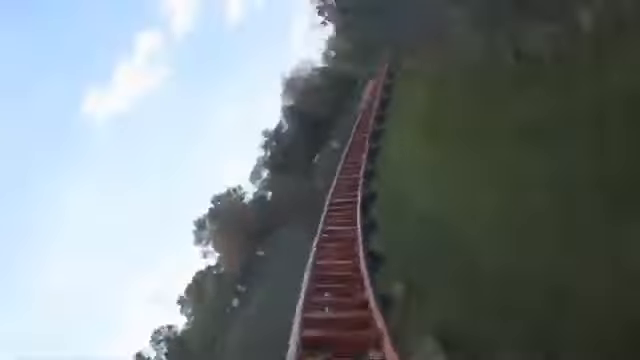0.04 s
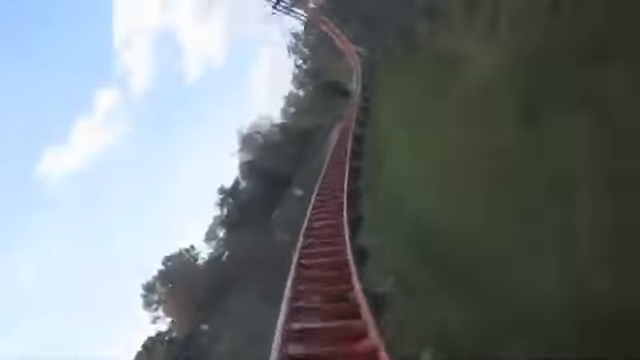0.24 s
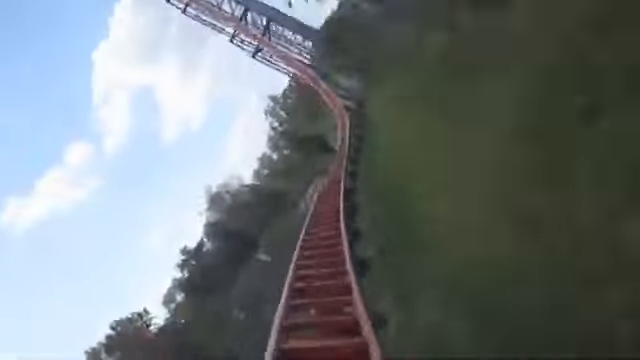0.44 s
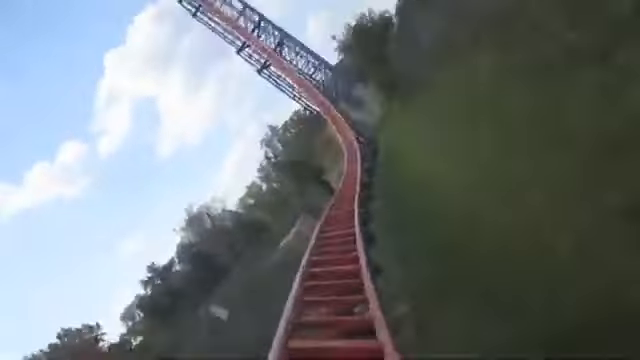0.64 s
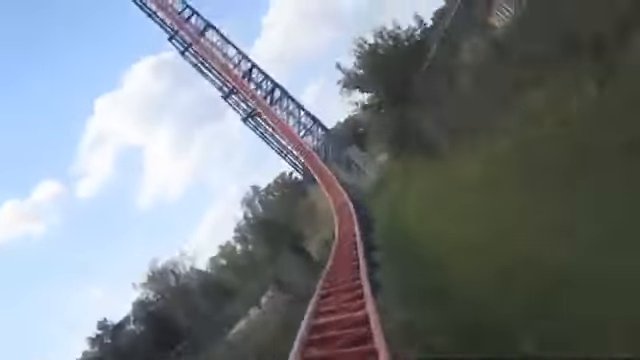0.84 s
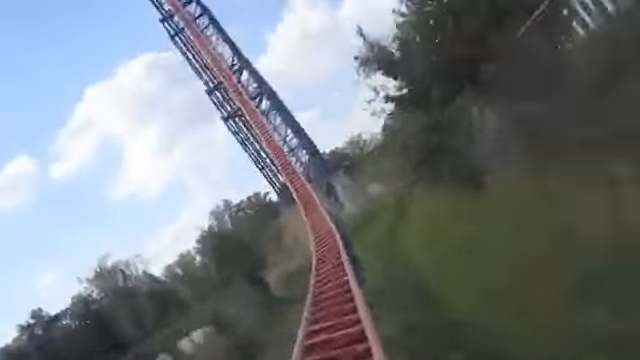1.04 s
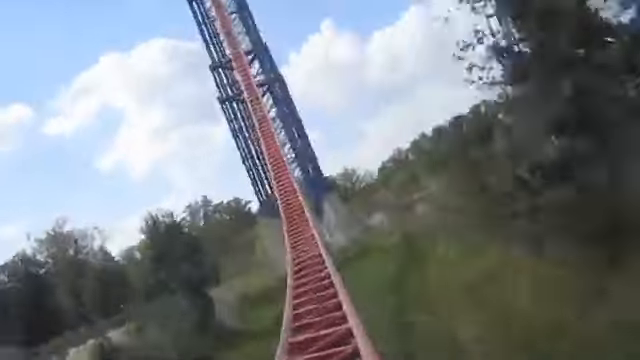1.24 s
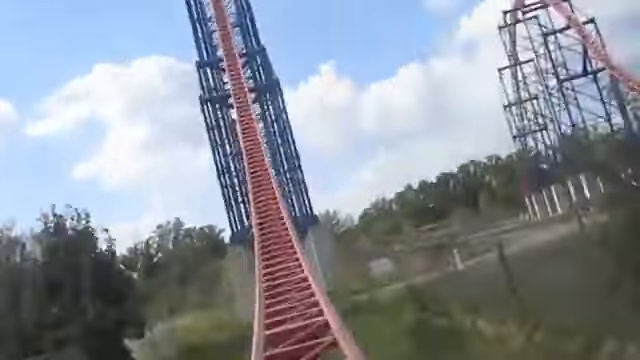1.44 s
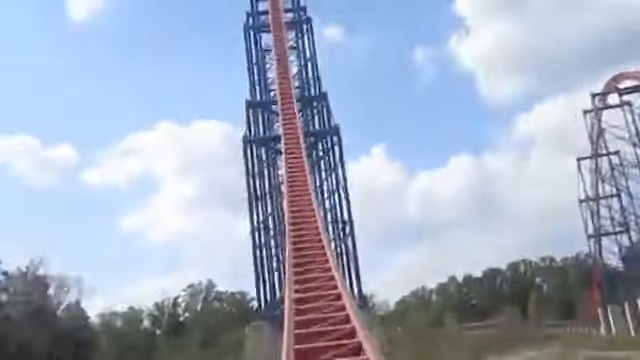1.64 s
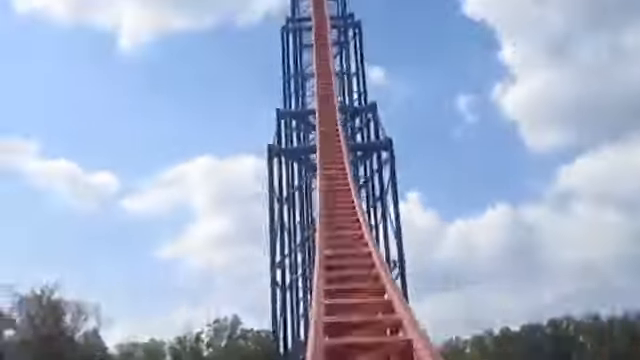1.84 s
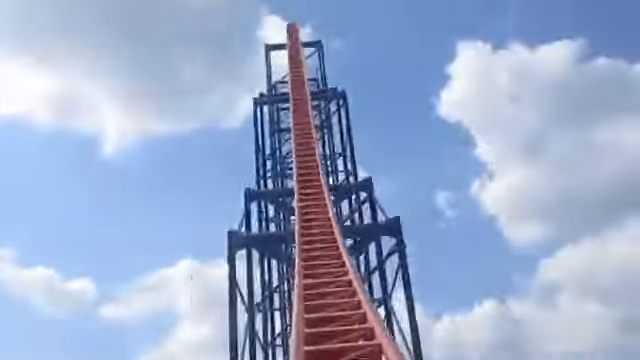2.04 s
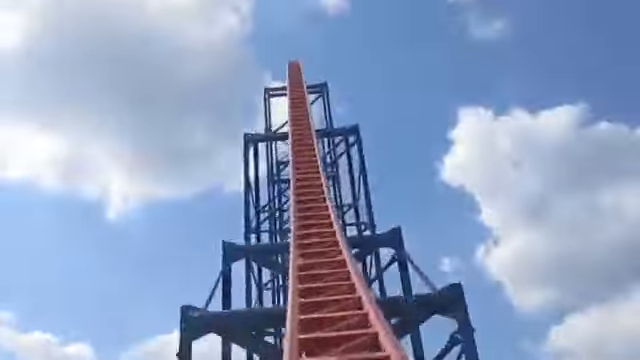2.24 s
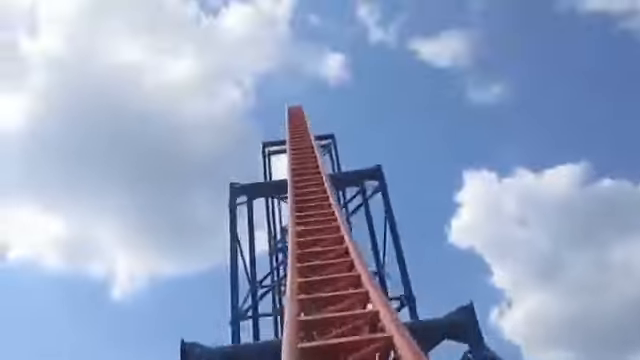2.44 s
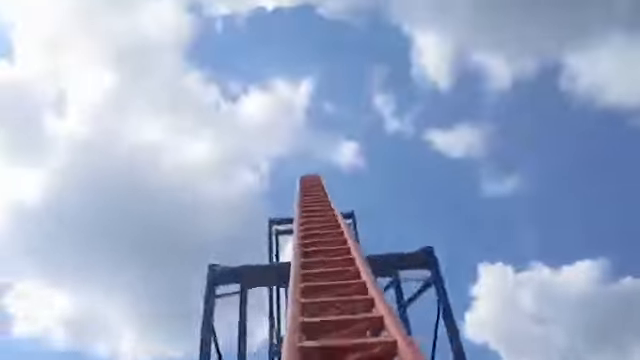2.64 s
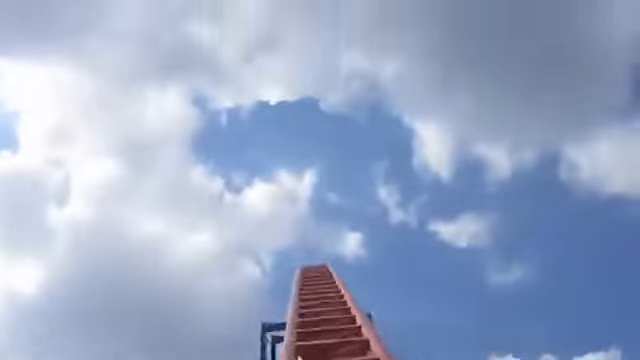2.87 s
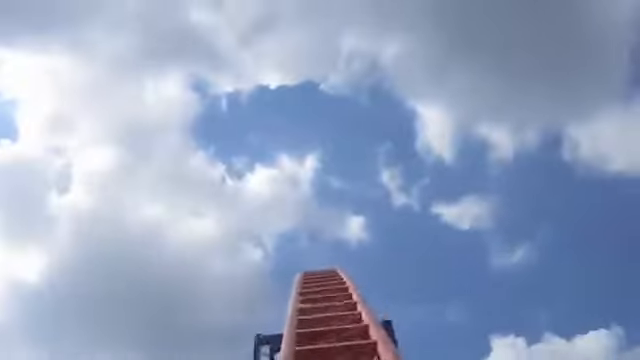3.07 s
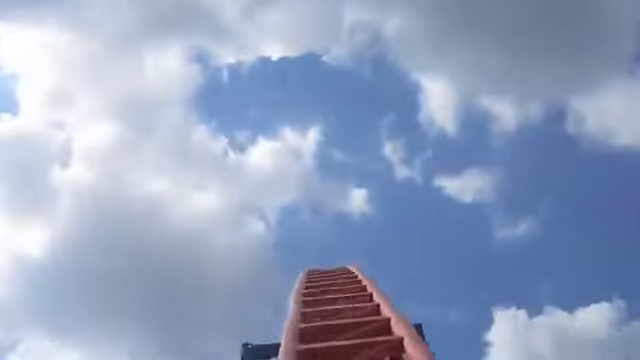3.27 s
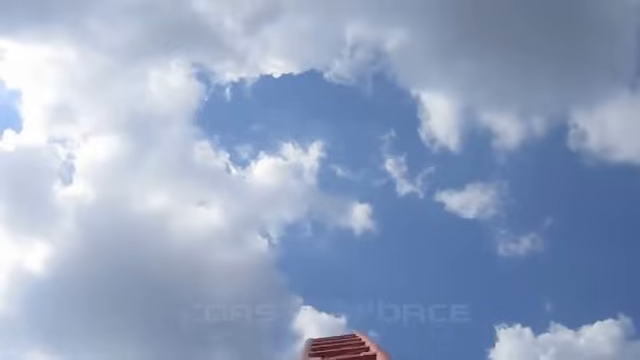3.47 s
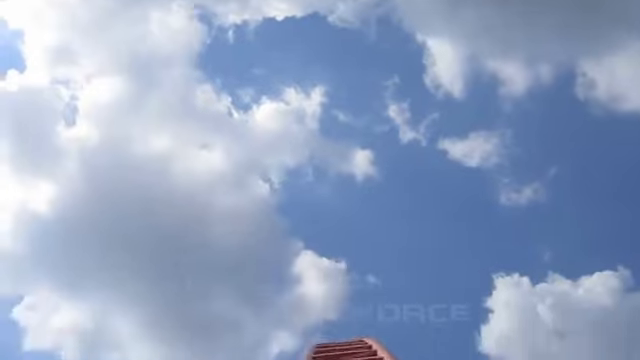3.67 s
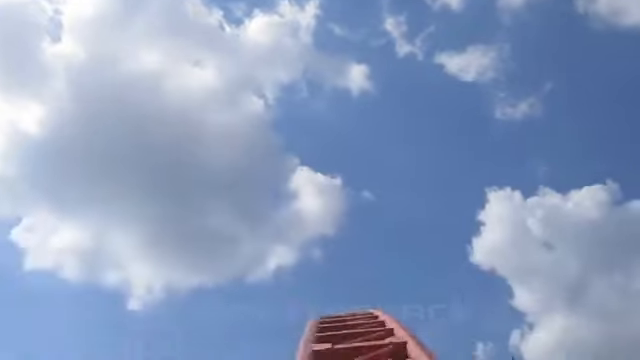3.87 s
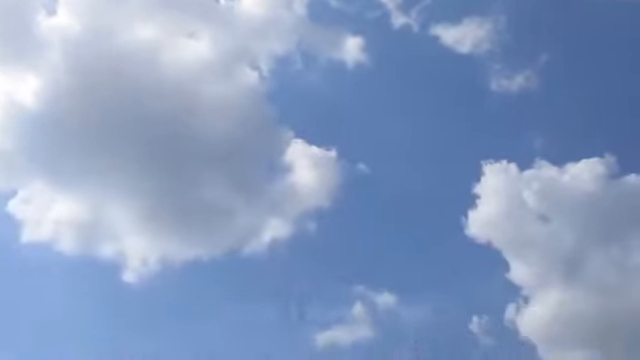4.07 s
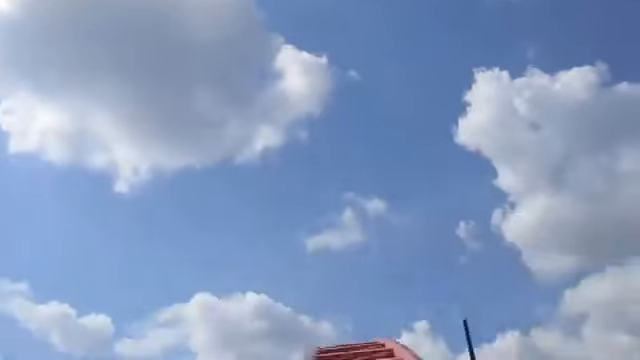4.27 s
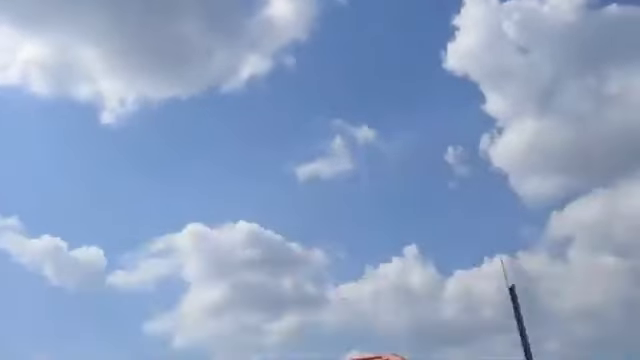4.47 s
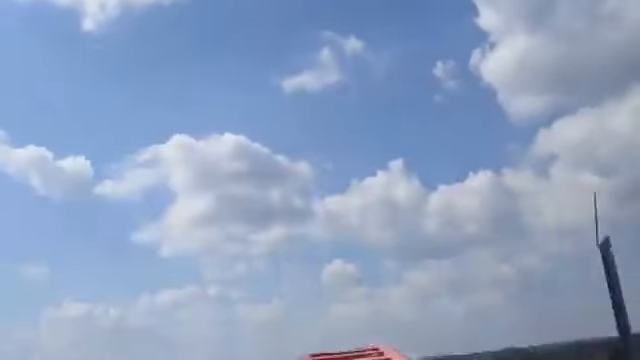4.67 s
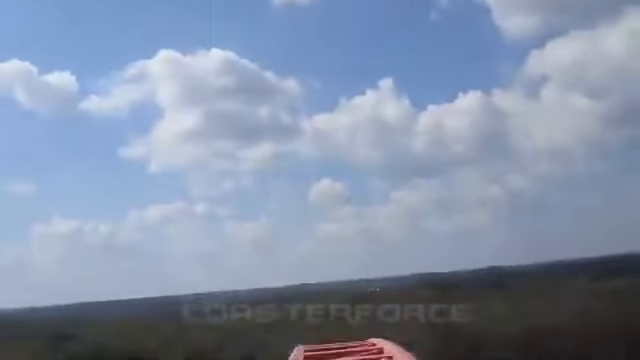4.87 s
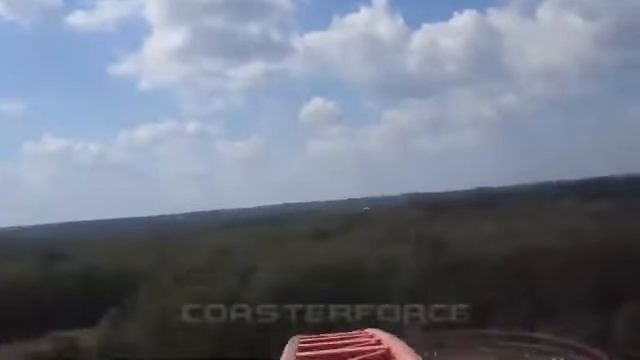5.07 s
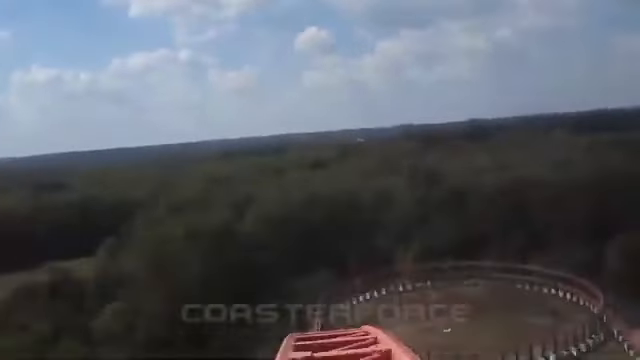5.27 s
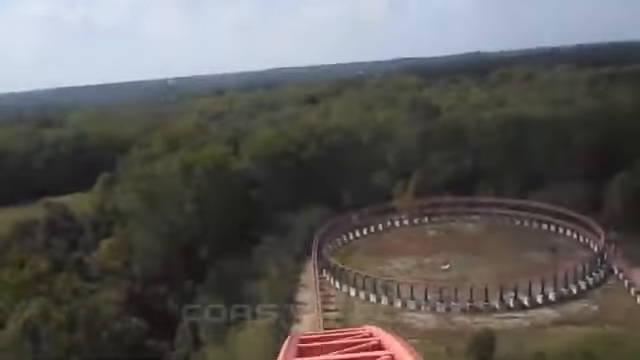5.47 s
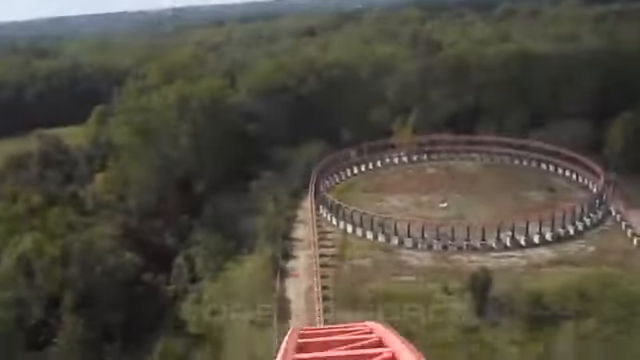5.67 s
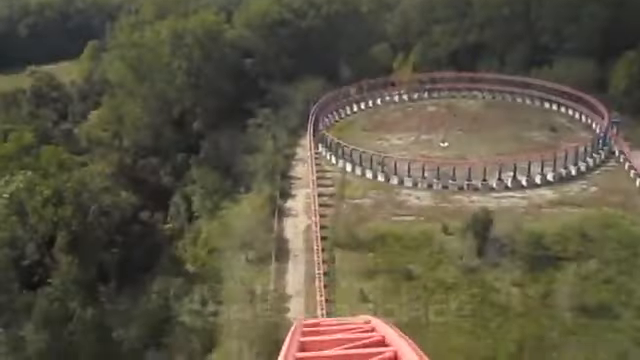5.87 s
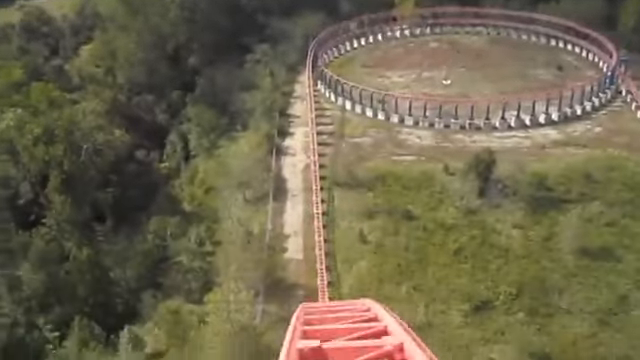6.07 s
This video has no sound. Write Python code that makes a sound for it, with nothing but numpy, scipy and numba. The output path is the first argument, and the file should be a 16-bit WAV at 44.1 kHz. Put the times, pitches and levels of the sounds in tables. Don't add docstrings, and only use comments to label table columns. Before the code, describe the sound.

Loud distorted roar of a steel coaster train with buffeting wind and metallic knocks, easing after three and a half seconds to a quieter rumble with small ticks.

```python
import sys
import numpy as np
from scipy import signal
from scipy.io import wavfile
from scipy.ndimage import uniform_filter1d
from numba import njit

SR = 44100
rng = np.random.default_rng(int(sys.argv[2]) if len(sys.argv) > 2 else 0)


def wav_out(sig):
    wavfile.write(sys.argv[1], SR, np.round(np.clip(np.atleast_2d(sig).T, -1, 1) * 32767).astype(np.int16))


def natural_amplitude(level_db):
    exponent = np.asarray(level_db, float) / 20
    return 10 ** exponent


N = 269451

# (time [s], rolling load [dB], air turbulence [dB])
RIDE = [(0, 2, 5.5), (.35, 3.5, -4.5), (.75, 2, 3), (.9, -1, -3), (1.3, -1, -5), (1.7, 1, -0.5),
        (2.05, 1, -2.5), (2.5, 2.5, -2.5), (3.0, 3.5, -0.5), (3.5, -1, -6), (3.75, -6.5, -10.5),
        (3.95, -10, -21), (4.15, -8, -12), (4.55, -6.5, -11), (4.85, -11.5, -19.5), (5.3, -11.5, -19.5),
        (5.5, -10.5, -16.5), (6.11, -11, -21)]
# (time [s], swell [dB], half width [s])
GUSTS = [(0.027, -23, 0.038), (0.091, 0, 0.0097), (.17, 2, 0.023), (.31, 9.5, 0.03), (.46, 7.5, 0.019),
         (0.601, -5, 0.015), (.68, 8.5, 0.021), (.77, 4, 0.028), (.84, -2, 0.085), (1.061, 4.5, 0.07),
         (5.72, 6.5, 0.03), (1.499, -6, 0.02), (1.6, -3, 0.011), (1.72, 4, .035), (2.5, 1, 0.034),
         (1.92, 1, 0.024), (1.98, -12, 0.031), (2.13, 8.5, 0.013), (2.58, 3.5, 0.064), (2.7, -0.5, 0.0076),
         (6.0, 5, 0.054), (3.06, 6, 0.068), (3.19, 3.5, .03), (3.47, 7, 0.068), (4.05, 6.5, .025),
         (4.41, 1, 0.019), (4.65, 8, 0.023), (4.83, 9.5, 0.017), (4.97, 11, 0.025), (5.4, 8.5, 0.044),
         (.54, -5.5, 0.041), (1.25, 0, .04), (2.18, 4, 0.0088), (2.44, 2.5, .012), (2.42, -1, .01),
         (3.4, -5, .025), (3.83, -2, 0.017), (3.93, 6, 0.038), (4.09, -0.5, .012), (4.22, 0, .03),
         (4.34, -2.5, .03), (4.52, 1.5, .03), (4.62, -4, .012), (4.77, -3, 0.028), (5.05, 0, 0.0077),
         (5.13, -2.5, .04), (5.3, -4.5, .03), (5.52, 2.5, 0.016), (5.58, 3.5, 0.012), (5.8, -5, .025),
         (5.88, 2.5, 0.012), (5.94, -5, .02), (2.22, 3, 0.014), (1.64, 2, 0.016), (4.39, 0, 0.0079)]
# (time [s], swell [dB], half width [s])
PUFFS = [(.16, 5, 0.037), (.31, 12, 0.081), (.68, 4.5, .03), (.98, -3, .03), (1.62, -6, .012),
         (2.45, 3.5, 0.056), (2.98, 4, .04), (4.65, 4, .015), (.46, 10.5, 0.024), (.77, 4.5, 0.016),
         (.87, -8, 0.057), (1.05, 3, 0.042), (1.33, 1, .025), (1.58, 6, 0.019), (1.73, 5, 0.025),
         (1.79, -8, 0.015), (2.0, 3, .04), (2.13, 1, 0.022), (2.22, 5.5, 0.015), (2.61, 5.5, 0.014),
         (2.77, 4, 0.011), (3.08, 4, 0.025), (3.22, 5, 0.017), (3.44, 2, 0.018), (3.66, 1.5, 0.024),
         (3.75, -1, 0.015), (4.05, 6, 0.027), (4.23, 5, 0.013), (4.395, 11.5, 0.054), (4.73, 14, 0.034),
         (4.89, 16, 0.011), (5.04, 15, 0.018), (5.17, 19, 0.03), (5.26, 12.5, 0.017), (5.62, 7.5, 0.046),
         (5.7, -2, .015)]
# (time [s], peak [dB], length
# [s])
SNAPS = [(0.0568, -33, 0.004), (0.1366, -25.5, 0.004), (0.181, -23.5, 0.0043), (0.219, -28, 0.004),
         (0.28, -27, 0.004), (0.387, -27, 0.004), (0.43, -31, 0.004), (0.45, -27, 0.004),
         (0.513, -32, 0.0043), (0.5511, -30, 0.004), (0.569, -30, 0.004), (0.593, -20.5, 0.0043),
         (0.611, -24, 0.004), (0.645, -20, 0.004), (0.6938, -26, 0.0036), (0.736, -25, 0.004),
         (0.7971, -30, 0.004), (0.897, -36, 0.004), (0.907, -37, 0.004), (0.933, -25, 0.004),
         (1.018, -24, 0.004), (1.0525, -25.5, 0.004), (1.0829, -26, 0.004), (1.1473, -28, 0.004),
         (1.2141, -27, 0.004), (1.25, -32, 0.004), (1.3124, -31, 0.004), (1.35, -30, 0.004),
         (1.416, -33, 0.004), (1.5638, -33, 0.004), (1.6, -27.5, 0.004), (1.64, -34, 0.004),
         (1.6516, -28, 0.004), (1.6821, -28, 0.004), (1.705, -27, 0.004), (1.7384, -23, 0.004),
         (1.823, -27, 0.004), (1.848, -30, 0.004), (1.865, -31, 0.004), (1.906, -28.5, 0.004),
         (2.03, -34, 0.004), (2.092, -33, 0.004), (2.13, -27.5, 0.004), (2.1864, -28, 0.004),
         (2.238, -36, 0.0035), (2.287, -32, 0.004), (2.305, -18.5, 0.004), (2.395, -29, 0.004),
         (2.4653, -30, 0.004), (2.494, -27, 0.004), (2.572, -22.5, 0.004), (2.6085, -26, 0.004),
         (2.6888, -23, 0.004), (2.733, -33, 0.004), (2.7541, -33, 0.004), (2.77, -31, 0.004),
         (2.826, -26.5, 0.004), (2.903, -24, 0.004), (3.042, -27, 0.004), (3.06, -23, 0.004),
         (3.1278, -33, 0.005), (3.156, -27, 0.005), (3.176, -25.5, 0.005), (3.2031, -30, 0.005),
               (3.266, -29.5, 0.0056), (3.299, -32, 0.005), (3.3128, -31, 0.005), (3.3523, -33, 0.005),
               (3.4, -36, 0.005), (3.433, -28, 0.005), (3.494, -28, 0.005), (3.5987, -40, 0.005),
               (3.6501, -36.5, 0.005), (3.736, -39, 0.005), (3.864, -46, 0.005), (4.2, -42, 0.005),
               (4.223, -36, 0.005), (4.283, -32, 0.005), (4.347, -36, 0.005), (4.4049, -34.5, 0.005),
               (4.567, -31, 0.005), (4.64, -38, 0.0038), (4.659, -42, 0.005), (4.721, -41, 0.005),
               (4.828, -41, 0.0044), (4.849, -33, 0.0046), (4.9382, -46, 0.0044), (5.03, -41, 0.005),
               (5.159, -38, 0.005), (5.367, -44, 0.005)]
# (frequency [Hz], width [Hz], level [dB])
RATTLE_MODES = [
    (2210, 690, -2),
    (4000, 1880, -10),
    (5070, 2800, -11),
]
# (time [s], peak [dB], pitch [Hz])
TICKS = [(3.6108, -24, 2100), (3.6348, -15, 1580), (3.7455, -17, 1520), (4.033, -17, 1900),
         (4.083, -20, 2220), (4.1231, -27, 1540), (4.184, -19, 2680), (4.2099, -13, 1850),
         (4.2788, -11, 1500), (4.3396, -17, 1540), (4.4105, -22, 1570), (4.4359, -17, 1640),
         (4.5043, -22, 1550), (4.5402, -22, 1910), (4.5906, -24, 1510), (4.612, -20, 1860),
         (4.639, -19, 1580), (4.819, -26, 2430), (4.9138, -30, 2080), (4.9293, -25, 1650),
         (5.1009, -25, 1500), (5.1977, -26, 1940), (5.352, -25, 2030), (5.4067, -21, 1800),
         (5.685, -19, 1550), (5.721, -20, 1500), (5.8667, -28, 2090), (5.9739, -24, 1710),
         (6.0404, -23, 2320), (6.0782, -21, 1570)]
# (time [s], peak [dB], pitch [Hz])
KNOCKS = [(0.0852, -4, 1680), (0.2845, -19, 1790), (0.3925, -8, 1760), (0.517, -22, 1710),
          (0.578, -6.5, 1980), (0.6708, -4.5, 1790), (0.89, -17, 1980), (0.9347, -10.5, 2000),
          (1.1468, -13, 2000), (1.3098, -13, 2150), (1.375, -27, 1750), (1.5898, -6, 2240),
          (1.721, -13.5, 2000), (1.9091, -6.5, 1670), (2.173, -20, 1720), (2.2787, -10.5, 1950),
          (2.3984, -12.5, 1970), (2.4963, -10, 1790), (2.68, -8, 2190), (2.7816, -32, 2200),
          (2.898, -6.5, 1700), (3.0644, 2.5, 2210), (3.1724, -9.5, 2110), (3.239, -8.5, 1820),
          (4.186, -27, 1900), (4.639, -21, 1650), (4.814, -32.5, 2120), (4.928, -27, 2130),
          (4.9637, -31, 2410)]
# (time [s], pitch [Hz], level [dB], half width [s])
SURGES = [(.2, 174.9, -12, .06), (.38, 134.3, -12, .05), (.45, 500, -24, 0.042), (.8, 500, -8.5, .05),
          (.97, 545, -12.5, 0.038), (1.12, 545, -11.5, .04), (1.18, 300, -12, 0.0596),
          (1.55, 475, -7.5, .05), (1.68, 480, -11.5, 0.06), (1.8, 559, -13.5, .05), (1.9, 778, -10.5, .04),
          (2.08, 556, -8, .06), (2.35, 500, -11, .05), (2.5, 778, -8.5, 0.041), (2.66, 555, -5, .04),
          (2.85, 550, -7, .05), (3.2, 500, -11, .06), (3.35, 500, -7.5, .05), (3.55, 495, -15, .05),
          (3.7, 255.2, -12.5, .04), (3.801, 139.3, -12.5, .04), (4.12, 492.5, -15, 0.067),
          (4.2, 214.4, -13.5, 0.059), (4.3, 139.8, -13, .05), (4.58, 493, -14.5, .07),
          (4.85, 141, -17, .05), (5.05, 490, -23, .05), (5.25, 487, -18.5, 0.046),
          (5.45, 229.6, -15.5, .05), (5.65, 134, -14, .05), (5.72, 250.8, -16, .04),
          (5.85, 490, -20, 0.045), (6.05, 200.6, -24, .04), (.1, 290, -17.5, 0.044), (.5, 120, -12, 0.038),
          (.65, 135, -11.5, 0.041), (1.35, 560, -17, .04), (1.5, 200, -13.5, 0.048), (2.0, 250, -19, 0.038),
          (2.2, 560, -10, 0.025), (2.401, 200, -13, 0.033), (2.62, 240, -14, .03), (2.95, 480, -12, 0.039),
          (3.45, 400, -12, 0.052), (4.15, 420, -17.5, .04), (4.22, 300, -17.5, 0.044),
          (4.45, 790, -19.5, .05), (4.8, 95, -14, .04), (5.15, 80, -18, .04), (5.5, 380, -19, 0.046)]
# (frequency [Hz], width [Hz], level [dB])
RAIL_MODES = [
    (860, 406, 5.5),
    (1230, 610, 0),
]
# (frequency [Hz], width [Hz], level [dB])
CAR_MODES = [
    (134.4, 15.3, -2.5),
    (298, 71, -7),
    (488.9, 31, 1.5),
    (562.6, 38.4, -1),
    (441, 157, -1.5),
    (776, 157, -1),
]

CAR_DB, BUFFET_DB, WHINE_DB = -8, -5.5, -5.5
RATTLE_DB, CHATTER_DB, HISS_DB = -23.5, -49, -31.5
BUFFET_PER_LOAD, WHINE_PER_LOAD, HISS_PER_AIR = 0.72, 0.19, 1.2
WHINE_PER_GUST, HISS_PER_GUST, BUFFET_PER_GUST = 0.67, 0.29, -0.18
EDDY_RATE, EDDY_DB = 130, 2.5
RAIL_V, SOFT_KNEE = .41, 6
CEILING_V, CEILING_KNEE = .48, 6
BASS_CUT_HZ, BASS_CUT_DAMP, PORT_HZ = 107, 1.76, 4600


def unit(x):
    return x / np.sqrt(np.mean(x ** 2))


def noise():
    return rng.standard_normal(N)


@njit
def svf(x, hz, k):
    y = np.empty((3, len(x)))
    b, l = 0., 0.
    for i in range(len(x)):
        g = np.tan(np.pi * hz[i] / SR)
        v = (b + g * (x[i] - l)) / (1 + g * (g + k))
        low = l + g * v
        b, l = 2 * v - b, 2 * low - l
        y[0, i], y[1, i], y[2, i] = low, k * v, x[i] - k * v - low
    return y


def filt(x, hz, damp):
    return svf(x, hz * np.ones(N), 1. * damp)


def walk(rate):
    hold = int(SR / rate)
    steps = np.repeat(rng.standard_normal(N // hold + 1), hold)
    slewed = uniform_filter1d(uniform_filter1d(steps, hold), hold)
    return 1.3 * slewed[:N]


def curves(table):
    s, *columns = np.transpose(table)
    return [np.interp(np.arange(N) / SR, s, c) for c in columns]


def swells(table):
    t = np.arange(N) / SR
    return sum(db * np.exp(-((t - s) / max(half, .005)) ** 2) for s, db, half in table)


def squash(x, top, knee):
    return x / (1 + np.abs(x / top) ** knee) ** (1 / knee)


def self_noise():
    level_db = -73 + 4.5 * np.tanh(walk(9))
    return natural_amplitude(level_db) * unit(filt(noise(), 11000, 0.88)[1])


def hiss(eddy_db):
    crackle = (rng.random(N) < 500 / SR) * natural_amplitude(2.5 * rng.exponential(size=N)) * noise()
    air = unit(noise()) + natural_amplitude(-17.5) * unit(crackle)
    return unit(natural_amplitude(eddy_db + walk(270)) * filt(air, 7400, 2.4)[1])


def snaps():
    t, shape = np.arange(N) / SR, np.zeros(N)
    for s, db, length in SNAPS:
        i = int(s * SR)
        age = (t[i:i + 4000] - s) / max(length, .002)
        shape[i:i + 4000] += natural_amplitude(db) * np.exp(-age) * (1 - np.exp(-age * 8.3))
    return shape * unit(filt(noise(), 4200, 3.1)[1])


def rattle():
    strength = natural_amplitude(3.0 * np.minimum(rng.exponential(size=N), 5))
    taps = (rng.random(N) < 900 / SR) * strength * noise()
    shake = unit(noise()) + natural_amplitude(-9.5) * unit(taps)
    total = np.zeros(N)
    for k, (hz, width, db) in enumerate(RATTLE_MODES):
        once = filt(shake, hz, width / hz)[1]
        rung = unit(filt(once, hz, 2 * width / hz)[1])
        total += (-1) ** k * natural_amplitude(db + walk(40)) * rung
    return unit(total)


def knocks(table):
    t, out, shake = np.arange(2000) / SR, np.zeros(N + 2000), noise()
    for s, db, hz in table:
        i = int(s * SR)
        push = np.exp(-t / .006) * np.resize(shake[i:i + 2000], 2000)
        rung = svf(push, hz + 0 * t, .16)[1]
        out[i:i + 2000] += natural_amplitude(db) * rung / np.abs(rung).max()
    return out[:N]


def buffet(eddy):
    slow = filt(noise(), 70 * (1 + 0.22 * walk(1.35)), 1.3)[0]
    broad = filt(filt(noise(), 370, 1.68)[0], 558, 1.29)[0]
    return unit(natural_amplitude(0.81 * eddy) * (unit(slow) + natural_amplitude(1.5) * unit(broad)))


def surges():
    out, waver = np.zeros(N), 1 + 0.02984 * walk(30)
    start = rng.random((len(SURGES), 1))
    for (s, hz, db, half), turn in zip(SURGES, start):
        i = np.arange(max(int((s - 3 * half) * SR), 0), min(int((s + 3 * half) * SR), N))
        swell = natural_amplitude(db) * np.exp(-((i / SR - s) / half) ** 2)
        out[i] += swell * np.sin(2 * np.pi * (turn + np.cumsum(hz * waver[i]) / SR))
    return out


def ring(modes, drift, flicker_db, rate):
    total = np.zeros(N)
    for hz, width, db in modes:
        centre = hz * (1 + drift * walk(2.855))
        mode = unit(filt(noise(), centre, width / hz)[1])
        total += natural_amplitude(db + flicker_db * walk(rate)) * mode
    return unit(total)


def rolling_body(whine_db):
    car = ring(CAR_MODES, drift=0.021, flicker_db=1.0, rate=12)
    rail = ring(RAIL_MODES, drift=0.11, flicker_db=3.0, rate=20)
    return filt(filt(car + natural_amplitude(whine_db) * rail, 1130, 1.0)[0], 1820, 1.61)[0]


def scene():
    load_db, air_db = curves(RIDE)
    gust_db = swells(GUSTS)
    eddy_db = EDDY_DB * 2 * np.tanh(walk(EDDY_RATE) / 2)
    flutter = walk(25.31)

    hiss_db = HISS_DB + HISS_PER_AIR * air_db + HISS_PER_GUST * gust_db + swells(PUFFS)
    hiss_db = hiss_db + 0.47 * flutter + 0.49 * walk(31)
    wind = natural_amplitude(hiss_db) * hiss(eddy_db) + natural_amplitude(8.0) * snaps()

    rattle_db = RATTLE_DB + air_db + gust_db + eddy_db + 0.56 * flutter
    steel = (natural_amplitude(rattle_db) + natural_amplitude(CHATTER_DB)) * rattle()
    steel = steel + natural_amplitude(4.5) * knocks(KNOCKS) + knocks(TICKS)

    thrum_db = BUFFET_DB + BUFFET_PER_LOAD * load_db + BUFFET_PER_GUST * gust_db + 1.33 * np.tanh(walk(18))
    thrum = natural_amplitude(thrum_db) * buffet(np.tanh(walk(26)))

    whine_db = WHINE_DB + WHINE_PER_LOAD * load_db + WHINE_PER_GUST * gust_db + 2.1 * walk(14)
    body_db = CAR_DB + load_db + 0.33 * eddy_db + 0.39 * walk(12)
    roar = natural_amplitude(body_db) * rolling_body(whine_db) + thrum
    return (roar + surges() + steel + wind)[None]


def top_cut(x):
    return signal.sosfilt(signal.butter(12, 15180, fs=SR, output="sos"), x)


def record(dry):
    clipped = squash(dry[0], RAIL_V, SOFT_KNEE)
    sagged = filt(clipped, BASS_CUT_HZ, BASS_CUT_DAMP)[2]
    capped = squash(sagged, CEILING_V, CEILING_KNEE)
    dull = filt(filt(capped, PORT_HZ, 1.35)[0], 13800, 2.54)[0]
    faded = dull * np.minimum((N - np.arange(N)) / 200, 1)
    mix = (faded + self_noise())[None] + .004
    return top_cut(mix)


dry = scene()
out = record(dry)
wav_out(out)
```